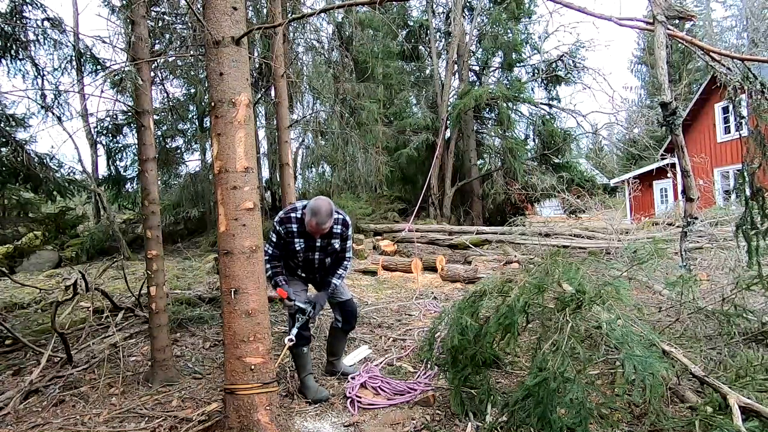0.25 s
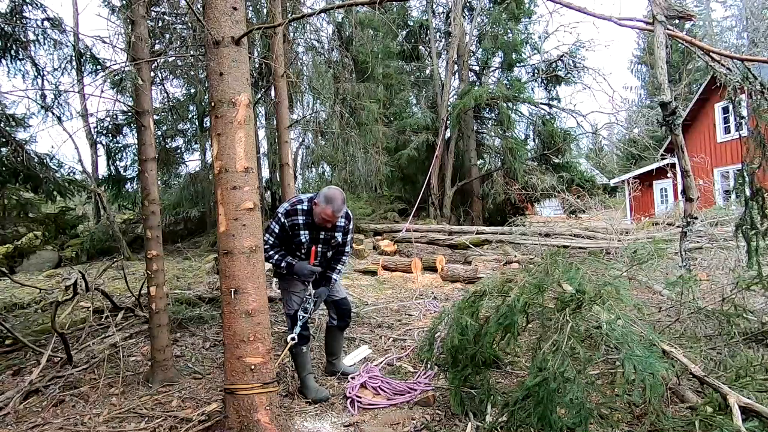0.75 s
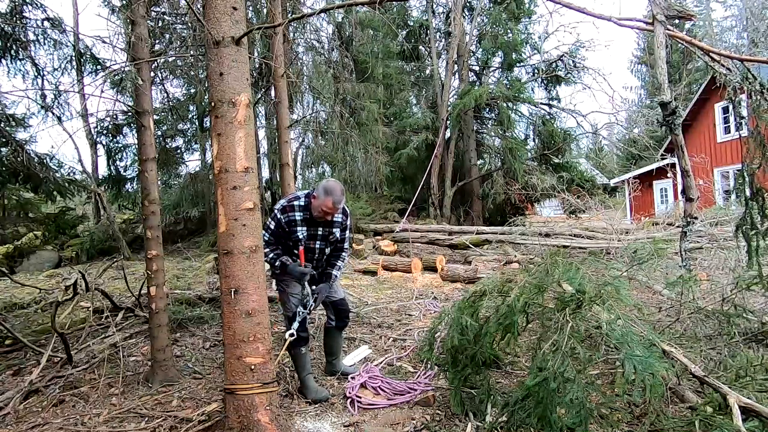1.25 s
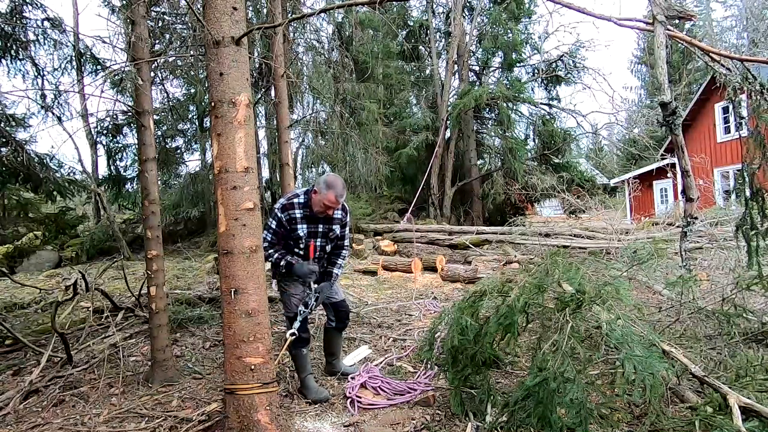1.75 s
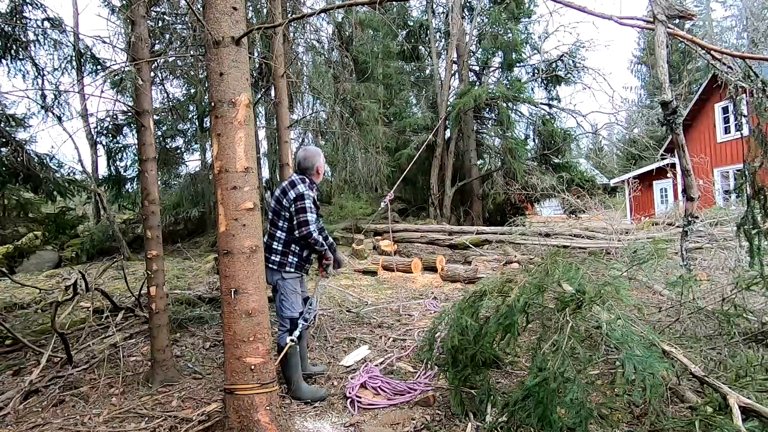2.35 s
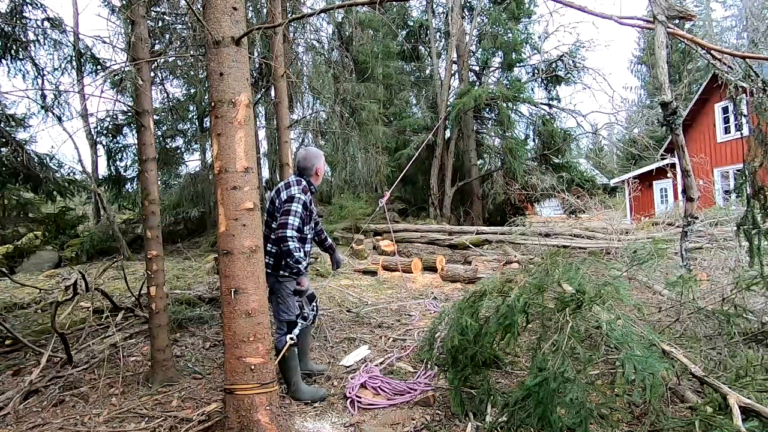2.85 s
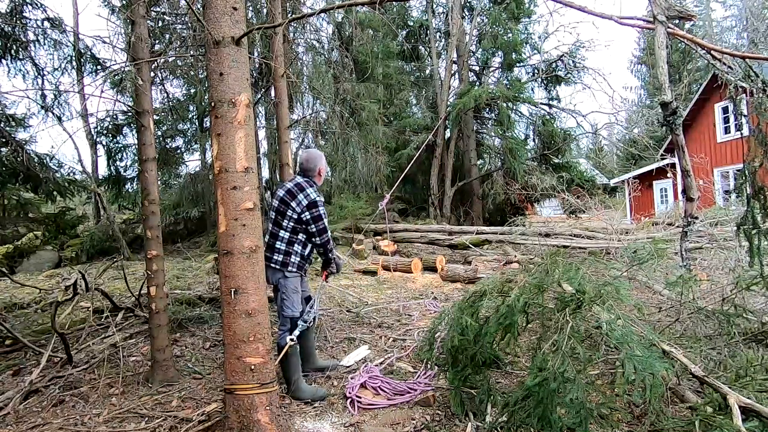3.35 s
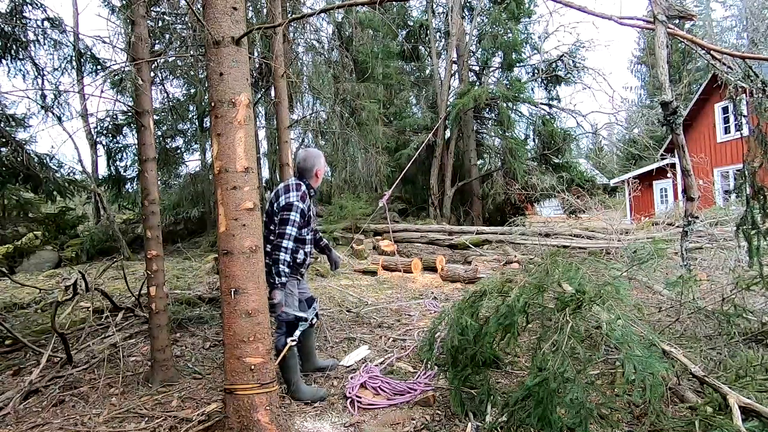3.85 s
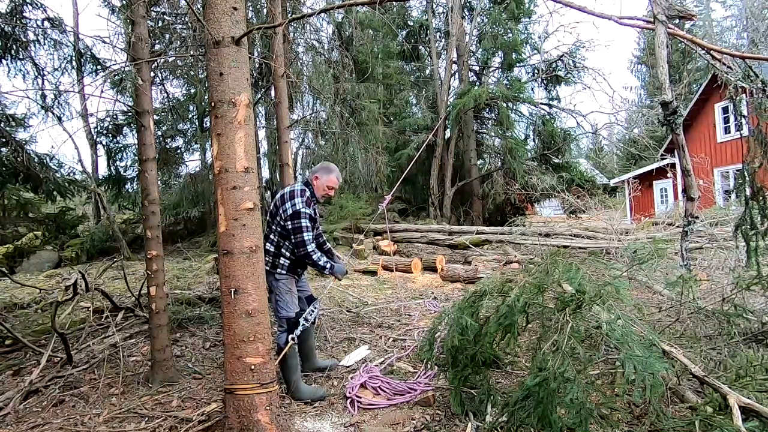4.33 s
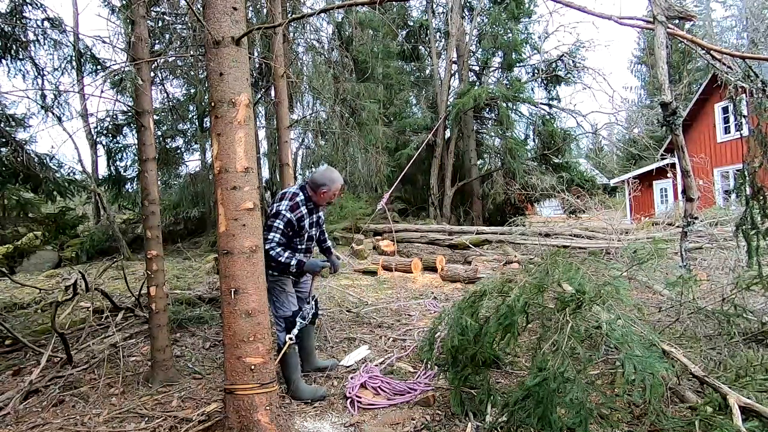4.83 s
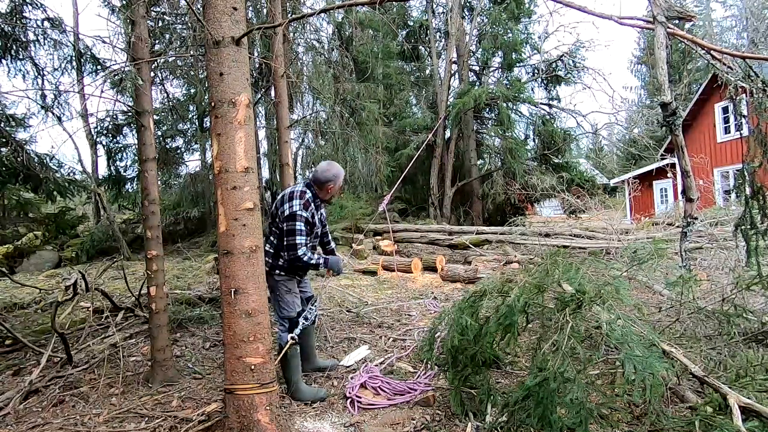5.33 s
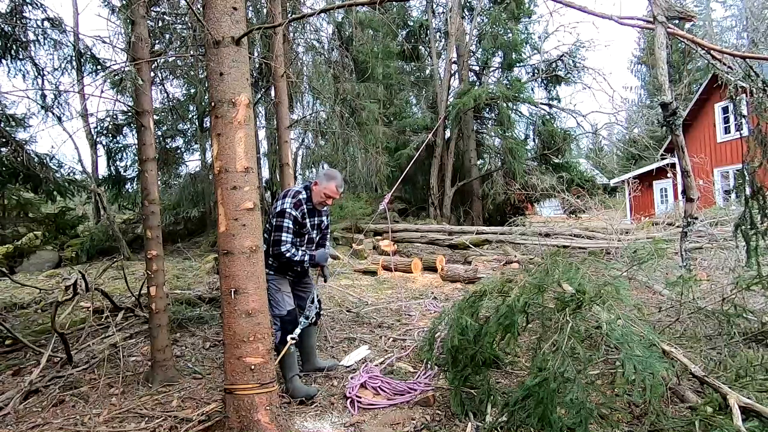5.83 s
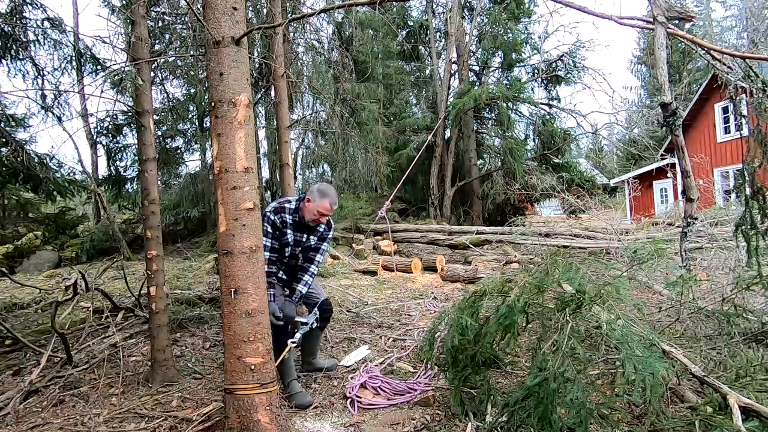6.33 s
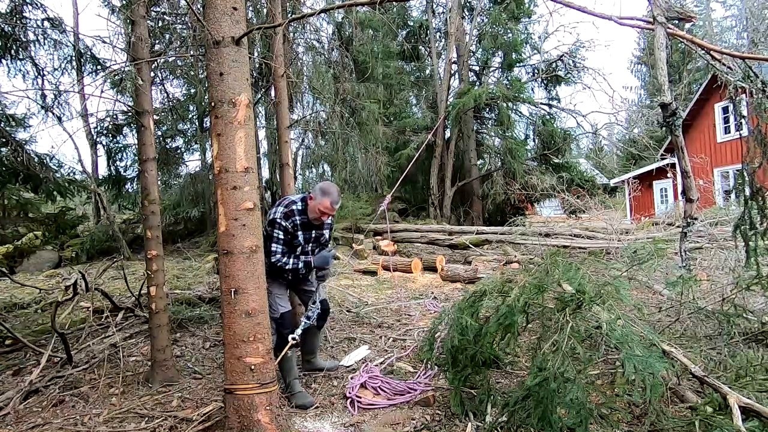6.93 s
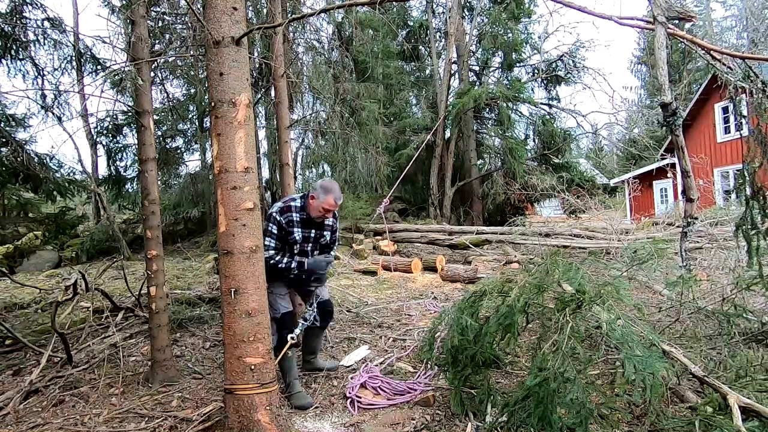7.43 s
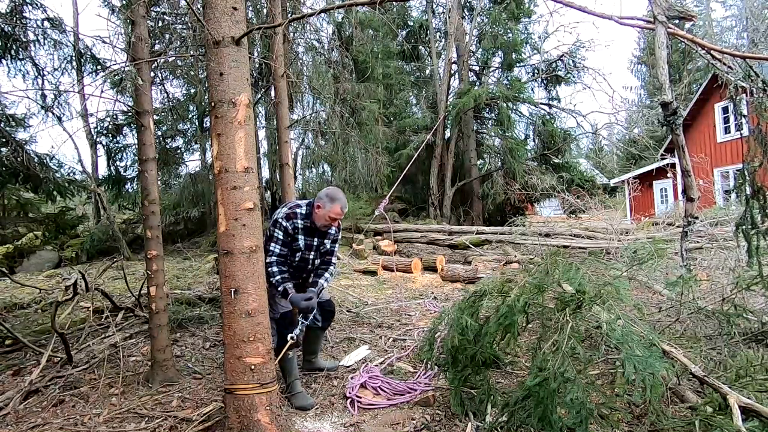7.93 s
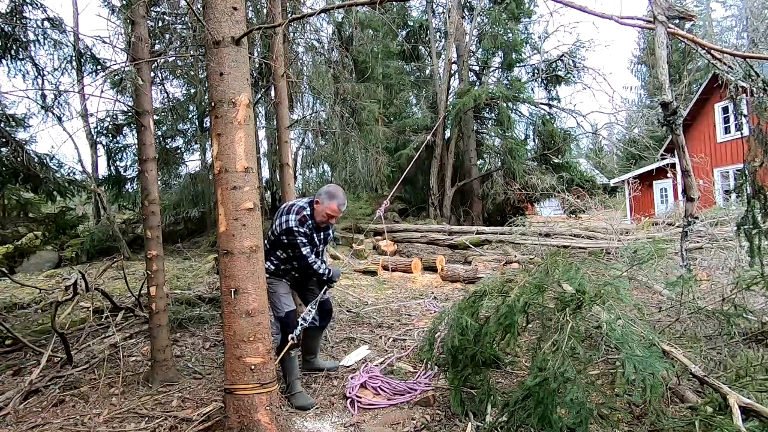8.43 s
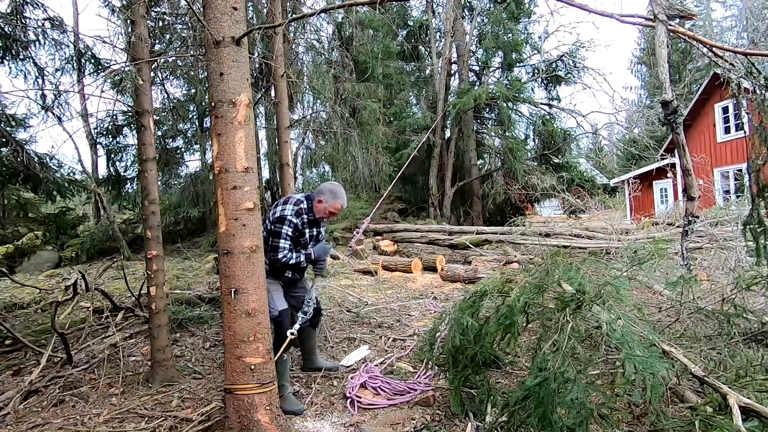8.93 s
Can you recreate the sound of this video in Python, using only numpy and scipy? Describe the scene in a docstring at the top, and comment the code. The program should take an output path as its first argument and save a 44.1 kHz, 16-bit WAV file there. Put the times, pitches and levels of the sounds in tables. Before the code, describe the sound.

Close outdoors in a forest, a hand-cranked ratchet winch clacks in rapid, irregular metal snaps for about two seconds. The sound then jumps abruptly to a quieter moment, where lighter clicks come in small groups with weaker rattles between them. Gears and rope grind, dry pivots chirp, and trunks return a very short echo. A faint low hum and air lie beneath. Stereo microphone a few metres away.

```python
"""A hand ratchet winch strapped to a tree trunk is pumped in short strokes a few metres from a stereo microphone.
Its pawl (the catch) snaps over the teeth: short noisy contacts ring the steel and set off a quick crack.
Gears and rope grind as filtered random slips, dry pivots squeak as gliding tones, and trunks echo the winch.
Beneath lie a wavering low hum, faint forest air and shifting boots, all made of filtered noise.
Once, early on, the sound jumps to a later, quieter moment."""
import sys
import numpy as np
from scipy import signal
from scipy.fft import rfft, irfft
from scipy.io import wavfile
from scipy.ndimage import uniform_filter1d

SR = 44100
rng = np.random.default_rng(int(sys.argv[2]) if len(sys.argv) > 2 else 0)


def digitize_waveform(pressure):
    """Quantize a signal to 16-bit integers and store it at the path in sys.argv[1].

    Rows of a 2-D input are taken as channels; values are limited to [-1, 1].
    """
    field = np.atleast_2d(pressure).T
    bounded = np.clip(field, -1, 1)
    quanta = np.round(bounded * 32767).astype(np.int16)
    wavfile.write(sys.argv[1], SR, quanta)


N = 404397  # length in samples
JUMP_S = 2.165  # when the sound jumps

# Blows of pawl and handle. Each row: time in seconds, peak level in dB, lower frame ring, upper frame ring
# and treble in dB against the whole blow, drag of the pawl before it lands fully in ms.
BLOWS = [(0.011, -49, -18, -19.5, -24, 2), (.02, -47, -18.5, -19.5, -23.5, 2),
         (.15, -56.5, -32, -23.5, -35, 9), (.205, -60, -10, -8, -32, 8), (0.247, -65, -48, -36, -40, 4),
         (0.3493, -42.5, -21.5, -15.5, -26, 13), (0.4174, -42.5, -42.5, -25.5, -36.5, 3.1),
         (0.4345, -36, -26, -24, -35.5, 3.9), (.462, -16.5, -31, -26, -22, 6),
         (0.505, -32.5, -24, -24, -22.5, 2.7), (0.549, -13, -32.5, -22.5, -15, 1.1),
         (0.6697, -31.5, -32, -30.5, -21.5, 2.3), (0.687, -18, -43.5, -22, -12.5, 0.5),
         (.7716, -35, -34, -27.5, -25, 2.7), (0.7845, -28, -21.5, -15.5, -20.5, 1.55),
         (.849, -35, -22, -14.5, -17.5, 2.4), (.902, -4, -21, -30, -12.5, 0.62),
         (0.9622, -3.5, -21, -24, -9.5, 0.14), (1.034, -8, -30, -23, -13, 1.7),
         (1.157, -8, -28, -23.5, -15, 0.4), (1.2464, -13.5, -37.5, -28, -23.5, 2.3),
         (1.3017, -19.5, -33, -28, -13, 4.2), (1.374, -14.5, -28.5, -25.5, -14, 5.1),
         (1.455, -40, -25, -20, -25.5, 0.93), (1.5, -20.5, -24.5, -29.5, -19.5, 2.1),
         (1.5572, -5.5, -26, -24.5, -13, 0.99), (1.5981, -6, -27.5, -25.5, -15, 0.53),
         (1.681, -35, -12.5, -17, -13.5, 3.3), (1.7417, -25.5, -23.5, -29, -30, 1.5),
         (1.7856, -13, -33, -25, -18.5, 0.64), (1.8342, -14, -28.5, -21, -13, 2),
         (1.933, -28.5, -28.5, -26, -31, 2.2), (1.9888, -19.5, -22, -26.5, -23.5, 2.9),
         (2.044, -4.5, -29, -25.5, -15, 0.51), (2.0785, -6.5, -31.5, -25, -15, .6),
         (2.155, -29, -20.5, -12, -19, 2.9), (2.3253, -43.5, -14, -22, -23, 3.5),
         (2.343, -44.5, -22, -18, -20.5, 2.8), (2.3865, -28, -19.5, -25, -29.5, 0.46),
         (2.418, -34, -9, -13, -15.5, 3.3), (2.455, -37.5, -28, -14.5, -7, 4.2),
         (2.5505, -55, -28, -18, -11.5, 3), (2.573, -14, -23.5, -15, -7, 0.25),
         (2.627, -57, -17, -19, -13.5, 3.3), (2.661, -16, -26.5, -25, -12.5, 0.3),
         (2.745, -13, -21, -19, -10.5, 0.15), (2.8757, -49, -29.5, -22, -23, 2.7),
         (2.9435, -30.5, -14, -22, -31, 3.3), (2.9694, -26.5, -23.5, -20.5, -22, 4.2),
         (3.0423, -25, -19.5, -20.5, -15.5, 1.8), (3.126, -26, -12, -22, -14, 3),
         (3.205, -22, -16, -22, -13, 1.7), (3.3194, -36.5, -30, -17.5, -17.5, 3.3),
         (3.3943, -52, -24, -10.5, -16, 3), (3.459, -37.5, -13.5, -14.5, -25.5, 2.1),
         (3.5205, -28, -16, -29.5, -25, 0.92), (3.652, -32, -11.5, -7.5, -10.5, 2.3),
         (3.68, -14.5, -21.5, -10, -6.5, 0.52), (3.7576, -13, -25.5, -9, -7.5, 0.53),
         (3.8424, -14.5, -24, -12, -9.5, 1.5), (3.977, -62, -25.5, -13.5, -17, 1.5),
         (4.0296, -36.5, -29, -13.5, -15.5, 12.4), (4.081, -25, -24.5, -16.5, -16.5, 4.4),
         (4.102, -34.5, -18, -19, -18.5, 15.2), (4.147, -40, -28.5, -16.5, -15.5, 5.2),
         (4.188, -29.5, -18, -12.5, -7.5, 7.3), (4.283, -55, -23.5, -18.5, -11.5, 2.4),
         (4.309, -26, -15.5, -14.5, -11, 5.3), (4.3962, -24.5, -13, -22.5, -11.5, 1.7),
         (4.4553, -37.5, -28, -14, -12, 3.7), (4.467, -39, -33, -21, -20.5, 9.9),
         (4.5273, -42.5, -24, -23, -20.5, 8), (4.578, -51, -25, -20, -30, 3), (4.65, -57, -25, -15, -25, 3),
         (4.73, -44, -25, -20, -22, 3), (4.6034, -44, -30, -27.5, -39, 2.5),
         (4.6773, -42, -7, -12, -23, 5.6), (4.712, -40, -20.5, -18.5, -22.5, 2),
         (4.764, -44, -23, -20, -22.5, 5.3), (4.8352, -14.5, -23, -21, -12, 0.23),
         (4.907, -14, -24, -13, -8, 0.22), (4.9826, -14.5, -19.5, -14.5, -8, 0.34),
         (5.0645, -15, -20.5, -15, -7.5, 0.29), (5.146, -44.5, -36, -22, -3, 1.2),
         (5.234, -37.5, -7, -15.5, -17.5, 5.4), (5.2562, -34, -18.5, -30.5, -17, 2.6),
         (5.305, -22.5, -18.5, -25, -17, 4.2), (5.372, -25.5, -19, -21.5, -12, 3.3),
         (5.4552, -23, -20, -19.5, -19.5, 4.7), (5.6875, -41, -3.5, -9, -17.5, 3.4),
         (5.7683, -29, -16, -16, -30.5, 3.8), (5.8137, -28, -25, -7.5, -16.5, 5.2),
         (5.893, -36, -21, -16.5, -11, 4.1), (5.93, -47, -27, -11, -10.5, 3),
         (5.962, -46, -25, -20, -15, 2.8), (6.0, -46, -25, -12, -15, 3.6), (6.045, -48.5, -25, -18, -15, 3),
         (6.1566, -12, -28, -15.5, -12, 0.2), (6.2322, -14.5, -25.5, -15, -10, 0.37),
         (6.2942, -14, -29.5, -20, -7.5, .3), (6.461, -40, -12, -9.5, -34, 3.7),
         (6.537, -31.5, -20, -23.5, -30.5, 3), (6.6054, -26, -18.5, -21, -9.5, 2.2),
         (6.678, -25, -28.5, -18.5, -15, 3.2), (6.7916, -27.5, -21, -22, -9, 1.58),
         (6.927, -26, -20, -10.5, -15.5, 3.9), (6.98, -34, -34, -24.5, -18.5, .6),
         (7.0008, -30, -33, -22.5, -16.5, 0.52), (7.022, -48, -27.5, -24.5, -3.5, 3.4),
         (7.0549, -14, -34, -21, -9, .3), (7.1182, -14.5, -28, -21.5, -12, 0.35),
         (7.174, -14.5, -28, -15, -11.5, 0.8), (7.209, -38, -9, -15, -27, 6.5),
         (7.267, -18, -25, -24.5, -13, 0.88), (7.35, -40, -17, -26, -22, 2.3),
         (7.3995, -37, -38, -20.5, -21.5, 5.3), (7.448, -24.5, -25.5, -23.5, -14.5, 3.3),
         (7.5089, -25.5, -14.5, -19.5, -11.5, 2.3), (7.5736, -24.5, -13, -21, -11, 3.4),
         (7.639, -23.5, -21.5, -16.5, -14, 4.9), (7.79, -36.5, -16, -4.5, -27, 9.2),
         (7.841, -24, -27, -5.5, -7.5, 5.6), (7.872, -28, -19, -9.5, -8.5, 1.6),
         (7.927, -14.5, -23, -18.5, -10.5, 0.28), (7.941, -25.5, -6.5, -27, -7.5, 5.3),
         (7.982, -15, -19.5, -19.5, -7, 0.38), (8.0303, -15.5, -18, -21, -9.5, 0.76),
         (8.0971, -16.5, -20.5, -14.5, -10, 0.39), (8.182, -33, -25, -21, -15, 3.6),
         (8.19, -26, -18, -20, -12, 3.3), (8.21, -32, -26, -28, -25.5, 2),
         (8.2457, -49, -23, -14, -6.5, 7.3), (8.2847, -26.5, -33, -17, -12, 3.2),
         (8.336, -27, -16, -21.5, -15.5, 1.3), (8.3883, -26.5, -22, -23, -12, 2.4),
         (8.438, -34, -22, -17, -21, 3.4), (8.4488, -24.5, -24, -20.5, -11, 2.1),
         (8.528, -31.5, -19.5, -20, -13, 6.2), (8.623, -22, -25, -19, -12.5, 3.7),
         (8.68, -31.5, -31, -16, -14, 7.1), (8.726, -42, -29.5, -20.5, -15.5, 3.5),
         (8.755, -54, -27.5, -22, -10, 3), (8.7806, -42.5, -20, -11, -32, 2.3),
         (8.796, -41.5, -27, -15.5, -22, 2.7), (8.85, -19, -25.5, -23, -26.5, 0.69),
         (8.876, -15.5, -29, -8, -15.5, 1.2), (8.912, -34, -24.5, -9, -17.5, 4.7),
         (8.929, -28.5, -30, -8, -15, 5.3), (8.961, -24.5, -31, -11, -10.5, 14.5),
         (9.014, -21.5, -27, -13.5, -13, 8.6), (9.086, -29, -25.5, -10.5, -14.5, 5.8),
         (9.1307, -7, -18, -12, -7, 0.4)]
# Pitches where the tone of a blow is set, in Hz: drum, lower frame, upper frame, middle, treble.
COLOUR_HZ = [800, 1200, 1520, 3200, 8000]
# Ringing modes of the steel. Each row: pitch in Hz, relative level in dB,
# time to fade by 60 dB in seconds, before each blow's own scaling.
STEEL = [(814, -19, 0.19), (1141, -11, 0.088), (1241, -8, 0.11), (1338, -12.5, 0.048), (1498.6, 2.5, 0.086),
         (1560, -6.5, 0.08), (1660, -10, 0.1), (1820, -12, 0.089), (2016, -12.5, 0.11),
         (2150, -27.5, 0.061), (2630, -10, 0.11), (3060, -9, 0.029), (3060, -8, 0.097), (3350, 2.5, 0.024),
         (3985, -0.5, 0.027), (4727, -13, 0.059), (5160, -6.5, 0.031), (5170, -6, 0.031), (6300, -29, 0.2),
         (7500, -25, 0.21), (7170, -18.5, 0.15), (8600, -16.5, 0.25)]
# Tone of the crack. Each row: pitch in Hz, relative level in dB per Hz.
CRACK = [(180, -61), (300, -10), (885, -23.5), (1150, -1), (2030, 0.5), (2360, 0), (2650, 4.5), (5080, 0),
         (6300, -2), (7080, -1.5), (10400, -14), (16000, -39.5)]
# Rings of the loaded frame under the rub. Each row: pitch in Hz, width in Hz, relative level in dB.
RUB_RINGS = [(791, 88, -4.5), (1152, 65, -0.5), (1235, 126, 10), (1526.5, 93, 14.5), (2630, 350, 5.5),
             (3190, 380, 2), (3405, 300, -8.5), (4036, 170, 4.5), (2065, 99, -10), (4400, 45, 0),
             (4720, 120, -3.5), (5310, 200, -3), (6010, 400, -7)]
# Tone of the broad rubbing hiss. Each row: pitch in Hz, relative level in dB per Hz.
RUB_HISS = [(500, -17), (1000, -7.5), (1500, 2), (1950, -1), (2500, 3.5), (4000, -0.5), (8000, -8),
            (11000, -19.5), (13500, -22), (16000, -44)]
# Rubbing strokes of the handle. Each row: start in seconds, hold in seconds, level in dB,
# frame ring and drum ring in dB against that level.
STROKES = [(0.503, 0.63, -61.5, 6, -9.5), (0.995, 0.05, -52.5, 2, -14), (1.3, 0.03, -55, 0, -9.5),
           (1.43, .2, -53.5, 7, -9), (1.777, 0.036, -43, 4, -21.5), (2.002, 0.098, -44, 3.5, -15),
           (2.42, 0.064, -61.5, -12.5, -2.5), (2.54, 0.046, -44.5, -1.5, -18),
           (3.102, 0.12, -61.5, 0.5, -28), (3.677, 0.18, -47.5, -1.5, -20.5),
           (4.122, 0.084, -54, -23, -12.5), (4.47, 0.026, -61, -10, -35), (4.7, 0.041, -57.5, -10, -21),
           (4.912, 0.032, -55, 0, -16), (5.292, 0.058, -49.5, 1, -9), (5.85, 0.16, -57.5, -6, -17.5),
           (6.327, 0.0066, -49, -1.5, -15), (6.47, 0.037, -54.5, -2, -12), (6.55, .06, -53.5, -8, -8.5),
           (6.8, 0.1, -63.5, -0.5, -18), (7.068, 0.14, -42, -1.5, -13.5), (7.502, 0.11, -56, -11, -15),
           (7.699, 0.024, -84, 10, -7), (7.85, 0.11, -44, -5, -11.5), (8.12, 0.055, -66, 2, -12),
           (8.302, 0.066, -49, -25, -15.5), (8.522, 0.017, -64.5, -21, -11), (8.75, 0.014, -62, -8, -3.5),
           (8.898, 0.032, -41.5, -12, -18.5), (9.15, .03, -37, -7.5, -39)]
# Squeals of dry pivots. Each row: start in seconds, length in seconds, start pitch in Hz, end pitch in Hz,
# level in dB, octave above in dB against the main tone.
SQUEAKS = [(.335, 0.063, 1503, 1495, -61.5, -30), (0.392, 0.053, 6500, 6540, -67, -27),
           (0.382, 0.059, 2220, 2370, -56, -11), (1.118, 0.032, 7400, 7540, -42.5, -30),
           (1.237, 0.0103, 3700, 4300, -34, -22), (1.674, 0.061, 7510, 7500, -40.5, -44),
           (1.715, 0.021, 4580, 4560, -50, -30), (2.15, 0.013, 7440, 7500, -40, -35.5),
           (2.448, 0.071, 2372, 2645, -46, -2), (2.512, 0.075, 1414, 1386, -52, -18),
           (2.532, 0.041, 1840, 2400, -50, -16), (2.54, .03, 1300, 1420, -46, -20),
           (2.665, .04, 2400, 2550, -52, -20), (7.11, .015, 820, 820, -51, -20),
           (7.2, .05, 1950, 2000, -50, -21), (6.16, 0.036, 2000, 2000, -43, -25),
           (6.305, .04, 2400, 2350, -49, -25), (4.439, 0.089, 8200, 8700, -67, -85),
           (4.604, 0.021, 8600, 8400, -68, -57), (4.705, 0.064, 8500, 8450, -63, -30),
           (4.967, 0.017, 4170, 4290, -42, -28), (5.04, 0.02, 4120, 4280, -39, -19),
           (5.842, 0.049, 8400, 8500, -65, -37), (6.8, 0.016, 2060, 2150, -43, -11),
           (6.283, 0.014, 1950, 2160, -45, -22), (6.957, 0.051, 3990, 4010, -54.5, -9),
           (7.135, 0.033, 787, 810, -47, -20), (7.195, .02, 800, 820, -46, -25),
           (7.225, .05, 810, 800, -54.5, -26), (7.062, .022, 1500, 1490, -41.5, -30),
           (6.393, 0.025, 1510, 1500, -50, -30), (3.65, 0.0184, 2700, 2650, -52, -20),
           (9.112, .016, 2700, 2100, -44.5, -20), (8.35, 0.027, 4030, 4500, -45, -17),
           (2.58, 0.058, 2610, 2730, -55, -27), (7.1, .022, 2200, 1880, -44, -20),
           (8.214, .06, 1905, 2590, -54, -21), (5.999, 0.041, 2200, 2340, -67, -19),
           (8.681, 0.028, 2630, 2600, -45.5, -29), (9.1, 0.033, 2000, 2260, -52, -15)]
# The ring that stands out at each harder blow. Each row: time in seconds, pitch in Hz, level in dB.
TEETH = [(0.462, 3360, -38), (0.549, 2605, -30), (0.687, 2340.0, -38), (0.902, 4670.0, -31),
         (0.9624, 5040.0, -29), (1.034, 3680.0, -23.5), (1.157, 3290.0, -29), (1.246, 4030.0, -24.5),
         (1.3014, 2560.0, -32.5), (1.374, 3850, -37), (1.5, 2970, -38), (1.5571, 5520.0, -31),
         (1.5986, 3190.0, -22.5), (1.7856, 3760.0, -32), (1.8342, 5500, -32), (1.9889, 3590.0, -38),
         (2.044, 4620.0, -24.5), (2.0787, 3450.0, -25.5), (2.573, 2670.0, -30.5), (2.661, 2700.0, -33),
         (2.745, 4640, -34), (2.9692, 3320, -38), (3.0423, 3330, -43), (3.126, 4000, -44),
         (3.205, 3100, -44), (3.5213, 3250.0, -44), (3.68, 4650, -32), (3.7576, 2700.0, -31),
         (3.8422, 2700.0, -33.5), (4.081, 3340.0, -38), (4.309, 4070, -47), (4.3961, 3220, -41),
         (4.8356, 2680, -28), (4.907, 2700, -33.5), (4.9825, 4070.0, -31), (5.0644, 4120.0, -35),
         (5.305, 3194, -34.5), (5.372, 4060, -38.5), (5.455, 4080, -42), (5.7684, 3240.0, -41),
         (6.1568, 2680, -31.5), (6.2322, 5300, -31), (6.2941, 2666, -32), (6.537, 3520, -45),
         (6.605, 5210.0, -46), (6.678, 5160.0, -44), (6.7916, 5150, -42), (7.0545, 3500, -35),
         (7.1182, 3050, -34), (7.174, 3550.0, -35), (7.267, 2980.0, -37), (7.448, 3413, -37.5),
         (7.5089, 2660.0, -47), (7.5733, 4270, -44), (7.639, 5080.0, -35), (7.927, 3170, -33),
         (7.9818, 3530.0, -33), (8.0304, 4630, -33), (8.0972, 3150, -39), (8.19, 3350.0, -39.5),
         (8.2847, 3960.0, -43), (8.336, 4100.0, -43), (8.3884, 3350.0, -46), (8.4488, 4050.0, -43),
         (8.623, 5170.0, -41), (8.85, 3080, -37), (9.1305, 3260.0, -32)]
# The rope drags over the drum. Each row: start in seconds, pitch in Hz, width in Hz, level in dB,
# length in seconds.
DRAGS = [(.888, 2060, 1800, -34.5, 0.036), (1.4, 2300, 3100, -38, 0.016), (.81, 1950, 300, -56.5, 0.078),
         (1.3, 1800, 900, -50.5, 0.12), (1.5, 1900, 900, -46, .06), (6.44, 2070, 780, -47.5, 0.079),
         (7, 2900, 1200, -52, .04), (4.67, 2670, 400, -55, .08), (4.75, 2840, 600, -54, 0.038),
         (8.62, 650, 400, -62, .1), (7.8, 610, 200, -65.5, 0.22), (2.5, 1400, 890, -54, 0.13),
         (7.1, 1630, 980, -47, 0.12), (2.5, 670, 300, -64.5, 0.21), (7.08, 680, 250, -60, 0.05),
         (7.14, 1200, 180, -46, 0.12)]
# Boots shift on the forest floor. Each row: start in seconds, pitch in Hz, width in Hz, level in dB,
# length in seconds.
THUDS = [(1.37, 194, 150, -62, 0.11), (3.165, 304, 302, -66.5, 0.048), (5.87, 317, 215, -67.5, 0.15),
         (7.93, 205, 162, -60.5, 0.083), (8.855, 68, 25.8, -62, 0.088), (7.8, 45, 40, -84, 0.32),
         (8.6, 40, 40, -81, .4), (9.0, 35, 40, -82, .17)]
# Level of the hum, one list before the jump and one after. Each row: time in seconds, level in dB.
HUM = [
    [(0.0, -62.5), (1.25, -59.5), (1.29, -70), (1.39, -53.5), (1.9, -64.5), (2.07, -52.5), (2.16, -60)],
    [(2.17, -70.5), (2.23, -73), (2.93, -69), (7.84, -70), (7.96, -61), (8.09, -70), (9.17, -71.5)],
]
# Tone of the hum. Each row: pitch in Hz, relative level in dB per Hz.
HUM_BAND = [(90, -70), (125, -14), (155, 4.5), (200, -2.5), (260, -15.5), (400, -56.5)]
# Tone of the forest air. Each row: pitch in Hz, relative level in dB per Hz.
AIR = [(20, -4.5), (60, 4), (120, 0), (300, 5), (600, -10), (1000, -7.5), (3000, -13.5), (8000, -21.5),
       (12000, -35.5), (16000, -76)]
# How alike left and right are. Each row: pitch in Hz, likeness from 0 to 1.
ALIKE = [(60, 0), (300, 0), (700, 0.7), (1500, 0.89), (3500, 0.94), (6500, 0.76), (7900, .2), (8800, 0.7),
         (15000, 0.5)]
# Level gap of the two microphone ports. Each row: pitch in Hz, left against right in dB.
PORT_DB = [(200, -.5), (700, -3.5), (1200, -1.3), (1600, -2), (2400, 1), (4400, -1.5), (5500, -3.5),
           (6200, -1), (7200, -4), (8700, 2.5), (10500, -4.5), (12500, -1.5), (15000, -1)]
# Phase gap of the two ports. Each row: pitch in Hz, lead of left in radians.
PORT_LEAD = [(400, -0.1), (1000, .4), (2100, .35), (2700, .05), (4400, 0), (5200, -0.6), (6000, .1),
             (6800, -.2), (8000, .6), (8500, -.3), (9200, -1), (10000, -.15), (12000, 0)]

# Blows: "slope" settings are per dB by which a blow is weaker than the hardest one.
BLOW_SIZE, BLOW_LEAD = 8192, 512  # samples in a blow, and those before it lands
RING_S, RING_SLOPE_S, CYCLES = 0.061, 0.0018, 1000  # ring time; CYCLES caps the listed fade times
SLACK_RING = 0.57  # share of the ring time before the jump
CONTACT_MS, CONTACT_SLOPE_MS, CONTACT_SCATTER = 1.12, 0.0088, 0.67  # chatter fade; random spread as natural log
LEAD_DB, LEAD_SLOPE, LEAD_MS = -35, 0.28, 24  # scrape around landing; weak blows creep in
TICK_DB, TICK_SLOPE = 17.5, 0.62  # sharp landing
MODE_SCATTER_DB, DETUNE, STEADY_HZ = 3.5, .017, 1380  # load shifts the modes; those below STEADY_HZ stumble less
BLOOM_MS, BLOOM_HZ = 5.5, 1530  # frame modes near this pitch build up slowly
CRACK_DB, CRACK_LATER_DB, CRACK_T60_S = 5, 3.5, 0.026  # against the modes, before and after the jump
CRACK_SLOPE, CRACK_RIPPLE_DB, DRAG_DULL_DB_MS = 0.064, 2.5, 0.5  # weak or dragged blows crack less
RATTLE_DB, RATTLE_T60_S, RATTLE_TREBLE_HZ, BOUNCE_DB = -20, 0.22, 8900, 2  # late rattle, its dullness and rebounds
DRUM_DB, DRUM_SLOPE = -4.5, 0.21  # the hardest blow wakes the drum least
SLACK_UPPER_DB, SLACK_DRUM_DB = -4, 3  # before the jump: less upper frame ring, more drum

# Grinding
STROKE_RISE_DB_S, STROKE_FALL_DB_S = 207.5, 144.5  # how fast a stroke swells and fades
RUB_REST_DB, REST_FRAME_DB, REST_DRUM_DB = -73.5, -78.5, -80  # idle rub and its rings
RUB_TREBLE_DB = -10.5  # treble against the rub
SLIP_TOP, GRIT_DB = 2.65, 4.5  # biggest slip against the usual; flutter of the slips
CATCH_LOW_DB, CATCH_HIGH_DB = 3, 4  # how far low and high rings catch on and off
SLACK_DB = -22  # the narrow rings are weaker before the jump

SQUEAK_ROUGH = 0.5
TOOTH_RISE_MS, TOOTH_T60_S, TOOTH_WAVER = 1.2, .045, 0.014
TRUNKS_DB, TRUNKS_T60_S, TRUNKS_TREBLE_HZ = -15.5, 0.11, 5750
AIR_DB, AIR_LATER_DB = -71.5, -82  # before and after the jump
CEILING, TOP_HZ = 1.3, 16000  # recorder limits: loudness and pitch


def undb(db):
    """Turn decibels into a gain."""
    return 10 ** (np.asarray(db) / 20)


def unit(x):
    """Scale to an rms (average strength) of 1."""
    return x / np.sqrt(np.mean(x ** 2))


def read(table, hz):
    """Look up a pitch table, spacing pitches as the ear does (log frequency)."""
    f, v = np.transpose(table)
    return np.interp(np.log(hz + 1), np.log(f), v)


def shape(x, gain):
    """Filter with a gain that depends on frequency."""
    size = x.shape[-1]
    return irfft(rfft(x) * gain(np.arange(size // 2 + 1) * SR / size), size)


def curves(tables):
    """Join lists of timed rows and draw each column as a line, sample by sample."""
    s, *columns = np.concatenate(tables).T
    return [np.interp(np.arange(N) / SR, s, c) for c in columns]


def walk(rate):
    """Draw random levels, rate per second, gliding from one to the next."""
    k = int(SR / rate)
    steps = np.repeat(rng.standard_normal(N // k + 1), k)
    return uniform_filter1d(steps, k)[:N]


def pair(common, other, hz):
    """Make left and right from a shared part and an opposed part."""
    alike = np.clip(read(ALIKE, hz), 0, 1)
    return np.sqrt(1 + alike) * common + np.array([[1], [-1]]) * np.sqrt(1 - alike) * other


def add(out, x, s):
    """Mix a sound in at time s; what starts before the jump is cut off by it."""
    i = int(s * SR)
    end = min(i + x.shape[-1], int(JUMP_S * SR) if s < JUMP_S else N)
    out[..., i:end] += x[..., :end - i]


def strokes():
    """Gains of the rub, its frame ring, drum ring and treble: each stroke rises, holds and falls."""
    t = np.arange(N) / SR
    out = undb([[RUB_REST_DB], [REST_FRAME_DB], [REST_DRUM_DB]])
    for s, hold, db, frame_db, drum_db in STROKES:
        early, late = np.maximum(s - t, 0), np.maximum(t - s - hold, 0)
        swell = undb(db - STROKE_RISE_DB_S * early - STROKE_FALL_DB_S * late)
        same_side = (t < JUMP_S) == (s < JUMP_S)
        out = out + swell * same_side * undb([[0], [frame_db], [drum_db]])
    return *out, out[0] * undb(RUB_TREBLE_DB)


def grind():
    """Uneven slips of gears and rope excite a hiss and narrow frame rings, each catching on and off."""
    slip_size = np.minimum(rng.exponential(size=N), SLIP_TOP)
    slips = rng.standard_normal((2, N)) * undb(6.6 * slip_size * (rng.random(N) < .05))
    hz = np.arange(N // 2 + 1) * SR / N
    slips = pair(*rfft(slips * undb(GRIT_DB * walk(110))), hz)
    sound = irfft(slips * undb(read(RUB_HISS, hz)), N)
    slack_db = np.where(np.arange(N) < JUMP_S * SR, SLACK_DB, 0)
    for f, width, db in RUB_RINGS:
        catch_db = (CATCH_LOW_DB if f < 1700 else CATCH_HIGH_DB) * walk(30)
        ring = irfft(slips / (1 + 2j * (hz - f) / width) ** 2, N)
        sound += ring * undb(db + slack_db + catch_db)
    sound, out = rfft(sound), 0
    # rub, frame ring, drum ring and treble each follow their own gain
    bands = [(1850, 6000), (1020, 1850), (300, 1020), (6000, 22050)]  # Hz
    for gain, (lo, hi) in zip(strokes(), bands):
        part = 1 / (1 + ((hz + 1) / hi) ** 16) / (1 + (lo / (hz + 1)) ** 16)
        out = out + unit(irfft(sound * part, N)) * gain
    return out


def forest():
    """Noise filtered into a wavering hum, unrelated left and right, and faint air, plus shifting boots."""
    hum = unit(shape(rng.standard_normal((2, N)), lambda hz: undb(read(HUM_BAND, hz))))
    hz = np.arange(N // 2 + 1) * SR / N
    air = pair(*rfft(rng.standard_normal((2, N))), hz) * undb(read(AIR, hz))
    air = unit(irfft(air, N))
    air_db = np.where(np.arange(N) < JUMP_S * SR, AIR_DB, AIR_LATER_DB) + 2.0 * walk(0.97)
    hum_db = curves(HUM)[0] + 2.0 * walk(2.6)
    return hum * undb(hum_db) + air * undb(air_db) + scuffs(THUDS)


def loose_parts():
    """Loose parts touch the ringing steel, so size and phase stumble: 64 random courses to pick from."""
    wander = rng.standard_normal((2, 64, BLOW_SIZE))
    wander = uniform_filter1d(uniform_filter1d(wander, size=300), size=300)
    return np.exp(9.5 * wander[0] + 14.9 * 1j * wander[1])


def steel_ring(damp, slack, stumble):
    """Each steel mode is a fading tone, with a new size and phase because every tooth is struck elsewhere."""
    t = np.arange(BLOW_SIZE) / SR
    hz, db, t60 = np.transpose(STEEL)
    t60 = np.minimum(t60, CYCLES / hz)  # high modes die sooner
    loose = 1 / (1 + (STEADY_HZ / hz[:, None]) ** 4)
    spot = rng.standard_normal((2, len(hz))) + 1j * rng.standard_normal((2, len(hz)))
    spot *= undb(MODE_SCATTER_DB * loose[:, 0] * rng.standard_normal(len(hz))) / np.abs(spot)
    touch = 1 + loose * (stumble[rng.integers(64, size=len(hz))] - 1)
    pitch = hz * (1 + DETUNE * rng.standard_normal(len(hz)))
    ring = np.exp(np.outer(2j * np.pi * pitch - damp / slack / t60, t)) * touch
    blooms = np.abs(hz[:, None] / BLOOM_HZ - 1) < .06
    ring *= np.where(blooms, 1 - np.exp(-1000 * t / BLOOM_MS), 1)
    return np.imag((undb(db) * pair(*spot, hz)) @ ring)


def frame_crack(scrape, press, tick, late, since, damp, stumble):
    """Dense modes blur into a quick noise crack and a quieter, duller rattle (returned as a spectrum)."""
    bins = np.arange(BLOW_SIZE // 2 + 1) * SR / BLOW_SIZE
    fade = press * np.exp(-damp * late / CRACK_T60_S)
    crack = rng.standard_normal((2, BLOW_SIZE)) * np.where(since < 0, scrape, fade)
    crack[0, BLOW_LEAD] = tick
    rattle = rng.standard_normal((2, BLOW_SIZE)) * (since > 0) * undb(RATTLE_DB)
    rattle *= np.exp(-damp * late / RATTLE_T60_S)
    rattle *= np.minimum(np.abs(stumble[rng.integers(64)]), 1.5)
    bounce = np.minimum(rng.exponential(size=BLOW_SIZE // 64), 3)
    rattle *= undb(BOUNCE_DB * np.repeat(bounce, 64))  # small rebounds
    both = rfft(crack) + rfft(rattle) / (1 + (bins / RATTLE_TREBLE_HZ) ** 2)
    both = pair(*both, bins) * undb(read(CRACK, bins))
    # the dense modes stand out in other places at every blow
    ripple = unit(uniform_filter1d(rng.standard_normal(len(bins)), size=50))
    return both * undb(CRACK_RIPPLE_DB * ripple)


def blows():
    """Pawl and handle strike: a short rattle of contacts rings the steel and comes with a quick crack."""
    out, rows = np.zeros((2, N)), np.array(BLOWS)
    since = (np.arange(BLOW_SIZE) - BLOW_LEAD) / SR  # seconds from landing
    bins = np.arange(BLOW_SIZE // 2 + 1) * SR / BLOW_SIZE
    stumble = loose_parts()
    small = 1 / (1 + (550 / (bins + 1)) ** 4)  # a small body radiates little bass
    usual = rows[:, 2:5].mean(axis=0)
    for s, peak_db, lower_db, upper_db, treble_db, drag_ms in rows:
        before = s < JUMP_S
        weak = rows[:, 1].max() - peak_db
        # harder blows ring shorter and, on average, touch more briefly
        ring_s = RING_S + RING_SLOPE_S * weak
        damp = np.log(1000) * 0.081 / np.clip(ring_s, .02, .5)
        contact_ms = CONTACT_MS + CONTACT_SLOPE_MS * weak
        contact_ms *= np.exp(CONTACT_SCATTER * rng.standard_normal())
        # the pawl scrapes off the tooth, lands and chatters; hard blows land with a sharper tick
        scrape = undb(min(LEAD_DB + LEAD_SLOPE * weak, -3.0)) * np.exp(-1000 * np.abs(since) / LEAD_MS)
        tick = undb(TICK_DB - TICK_SLOPE * weak) * np.exp(-drag_ms)
        drag = max(drag_ms, .01) / 1000
        press = np.clip(0.46 + 0.66 * since / drag, 0, 1)
        chatter = press * np.exp(-1000 * np.maximum(since - drag, 0) / max(contact_ms, .1))
        contact = rng.standard_normal(BLOW_SIZE) * np.where(since < 0, scrape, chatter)
        contact[BLOW_LEAD] = tick
        modes = rfft(steel_ring(damp, SLACK_RING if before else 1, stumble)) * rfft(contact)
        late = np.maximum(since - drag - contact_ms / 1000, 0)  # fading starts after drag and contact
        crack = frame_crack(scrape, press, tick, late, since, damp, stumble)
        share = undb(CRACK_DB if before else CRACK_LATER_DB)
        share *= undb(-CRACK_SLOPE * weak - DRAG_DULL_DB_MS * drag_ms)
        both = modes / np.linalg.norm(modes) + share * crack / np.linalg.norm(crack)
        # only how a blow's tone differs from the usual blow is applied
        drum_db = DRUM_DB + DRUM_SLOPE * weak + SLACK_DRUM_DB * before
        upper_tint = upper_db - usual[1] + SLACK_UPPER_DB * before
        tint = np.array([drum_db, lower_db - usual[0], upper_tint, 0, treble_db - usual[2]])
        blow = irfft(both * small * undb(read(np.c_[COLOUR_HZ, tint], bins)))
        blow *= undb(peak_db) / np.abs(blow.mean(axis=0)).max()
        add(out, blow, max(s - BLOW_LEAD / SR, 0))
    return out


def trunks(x):
    """Scattered echoes off the trees, a fading burst of noise duller than the direct sound."""
    t = np.arange(SR // 2) / SR
    fade = np.exp(-np.log(1000) * t / TRUNKS_T60_S) * np.minimum(1, t / 0.0037)
    echo = rng.standard_normal((2, len(t))) * fade
    hz = np.arange(len(t) // 2 + 1) * SR / len(t)
    echo = irfft(pair(*rfft(echo), hz) / (1 + (hz / TRUNKS_TREBLE_HZ) ** 2), len(t))
    echo *= undb(TRUNKS_DB) / np.linalg.norm(echo[0])
    out, i = np.zeros((2, N)), int(JUMP_S * SR)
    # no echo carries over the jump
    add(out, signal.fftconvolve(x[None, :i], echo, axes=1), 0)
    add(out, signal.fftconvolve(x[None, i:], echo, axes=1), JUMP_S)
    return out


def squeaks():
    """Dry pivots stick and slip in step with one mode: a wavering, slightly rough tone."""
    out = np.zeros(N)
    for s, length, hz0, hz1, db, octave_db in SQUEAKS:
        u = np.arange(int(length * SR)) / (length * SR)  # progress from 0 to 1
        waver = uniform_filter1d(rng.standard_normal((2, 8192)), size=36)[:, :len(u)] * 6
        pitch = (hz0 + (hz1 - hz0) * u) * (1 + 0.012 * waver[0])
        phase = 2 * np.pi * np.cumsum(pitch) / SR
        swell = np.minimum(1, u / 0.16) * np.minimum(1, (1 - u) / 0.053)
        swell *= undb(db + 1.17 * waver[1])
        rough = uniform_filter1d(rng.standard_normal(8192), size=64)[:len(u)] * 8
        swell *= 1 + SQUEAK_ROUGH * rough
        tone = np.sin(phase) + undb(octave_db) * np.sin(2 * phase)
        add(out, np.sqrt(2) * swell * tone, s)
    return out


def teeth():
    """Each harder blow makes one ring stand out: a short, slightly unsteady fading tone."""
    out, t = np.zeros((2, N)), np.arange(4096) / SR
    swell = (1 - np.exp(-1000 * t / TOOTH_RISE_MS)) * np.exp(-np.log(1000) * t / TOOTH_T60_S)
    for s, hz, db in TEETH:
        waver = unit(uniform_filter1d(rng.standard_normal(len(t)), size=60))
        phase = 2 * np.pi * np.cumsum(hz * (1 + TOOTH_WAVER * waver)) / SR
        tone = pair(np.sin(phase), np.cos(phase) * rng.choice([-1, 1]), hz)
        add(out, undb(db) * swell / swell.max() * tone, s)
    return out


def scuffs(table):
    """Rope drags or boot shifts: short swells of gritty noise around one pitch."""
    out, size = np.zeros(N), SR // 2
    for s, centre, width, db, length in table:
        patches = np.repeat(rng.standard_normal(SR // 200 + 1), 100)[:size]
        grit_db = 1.2 * rng.exponential(size=size) + 3.0 * patches
        grit = rng.standard_normal(size) * undb(grit_db)

        def band(hz):
            return 1 / (1 + (2 * (hz - centre) / width) ** 4) * np.minimum(hz / centre, 1) ** 2
        grit = shape(grit, band)[:int(length * SR)]
        add(out, undb(db) * unit(grit * np.hanning(len(grit))), s)
    return out


def ports(x):
    """The winch reaches the two microphone ports with level and phase gaps that change with pitch."""
    half = np.array([[.5], [-.5]])  # each side takes half the gap

    def gap(hz):
        return undb(half * read(PORT_DB, hz)) * np.exp(1j * half * read(PORT_LEAD, hz))
    return shape(x, gap)


def scene():
    """Mix the winch, its echoes and the forest."""
    winch = blows() + grind() + squeaks() + scuffs(DRAGS) + teeth()
    echoes = trunks(winch.mean(axis=0))
    return ports(winch + echoes) + forest()


def record(dry):
    """The recorder rounds the loudest peaks and cuts the top steeply."""
    soft = CEILING * np.tanh(dry / CEILING)
    top_cut = signal.ellip(10, .2, 70, TOP_HZ, fs=SR, output="sos")
    return signal.sosfilt(top_cut, soft)


dry = scene()
out = record(dry)
digitize_waveform(out)
```